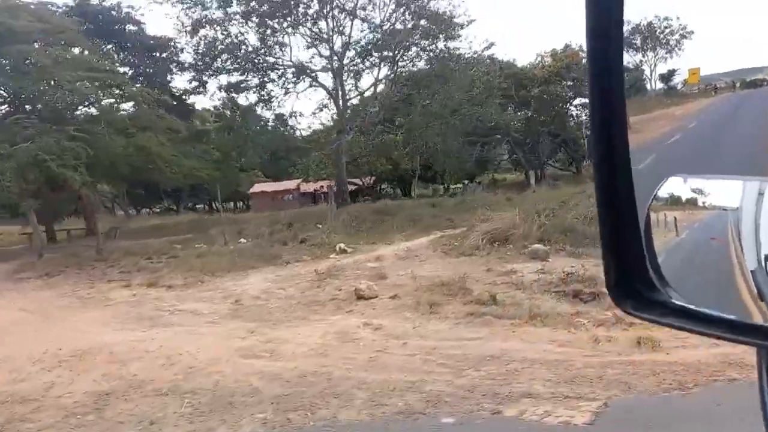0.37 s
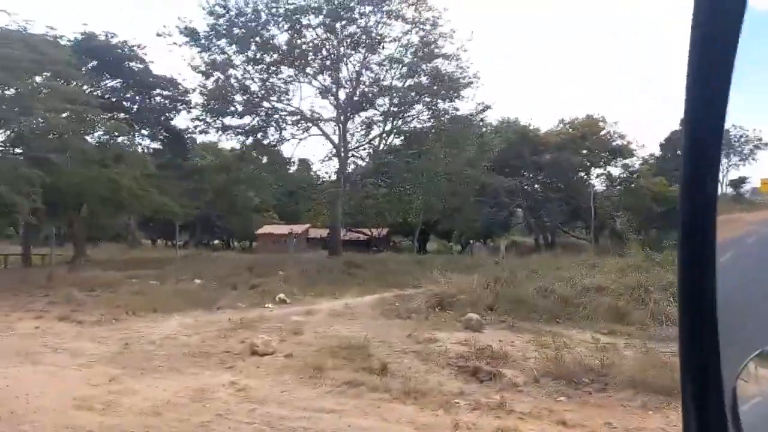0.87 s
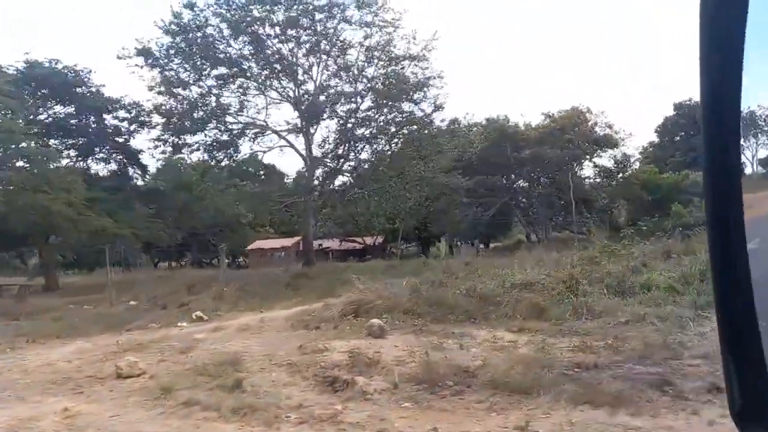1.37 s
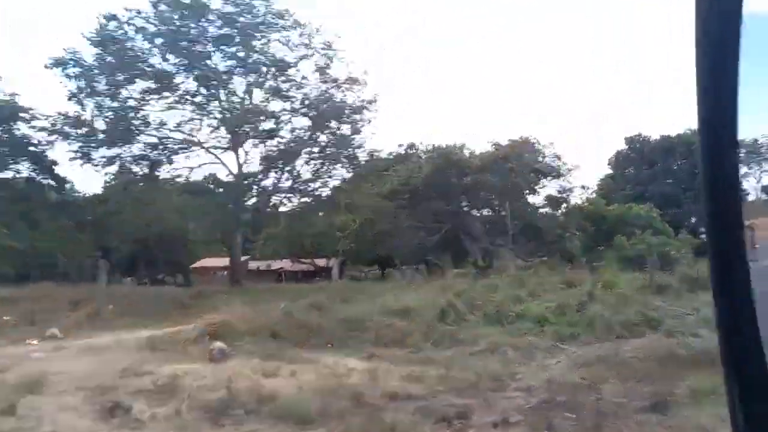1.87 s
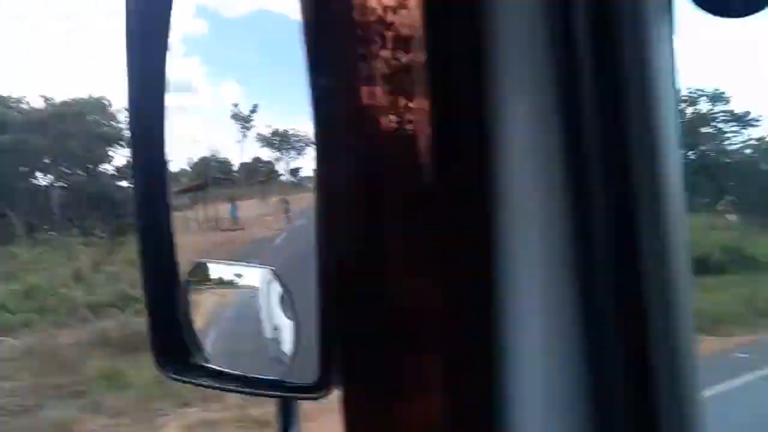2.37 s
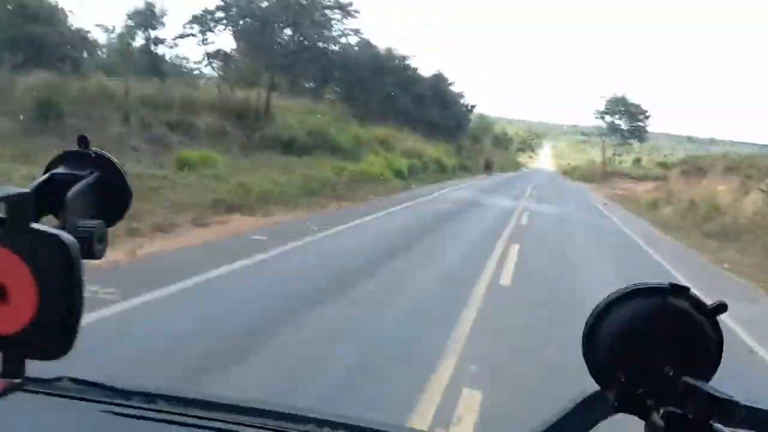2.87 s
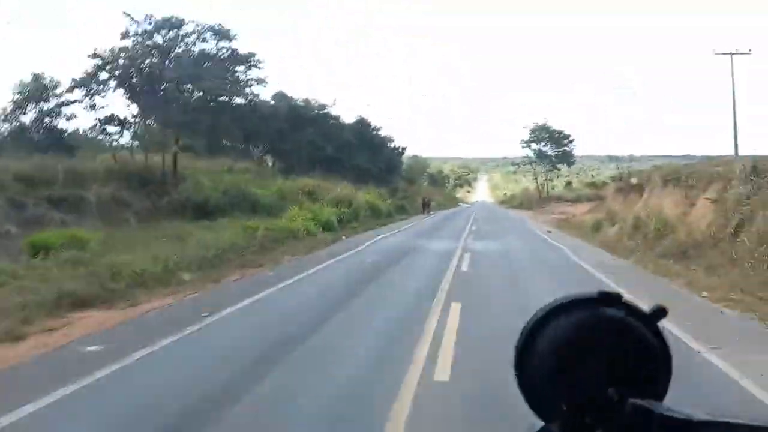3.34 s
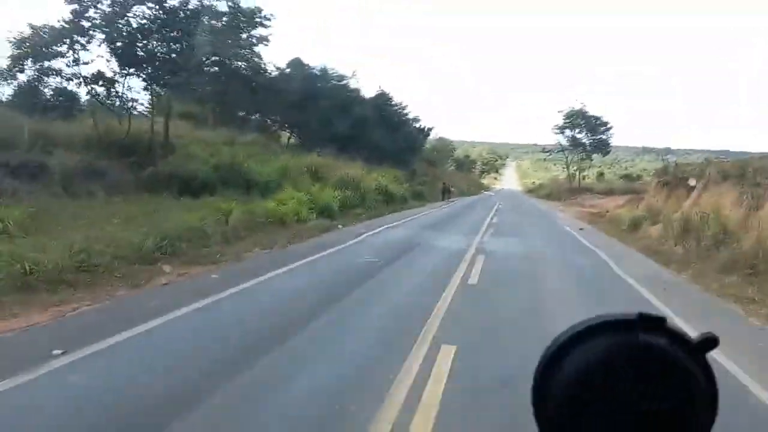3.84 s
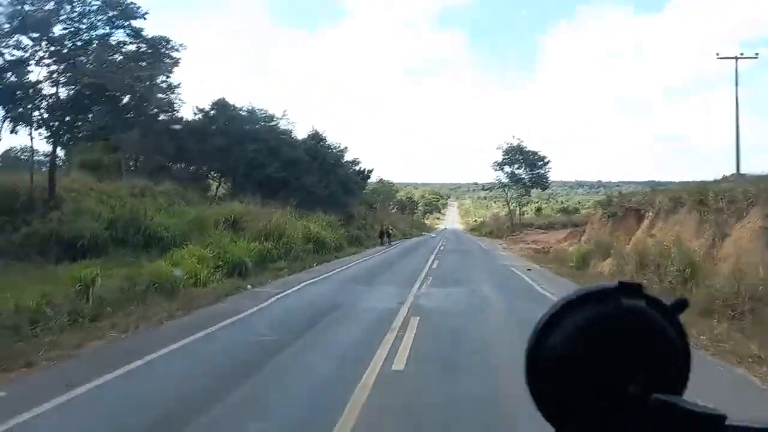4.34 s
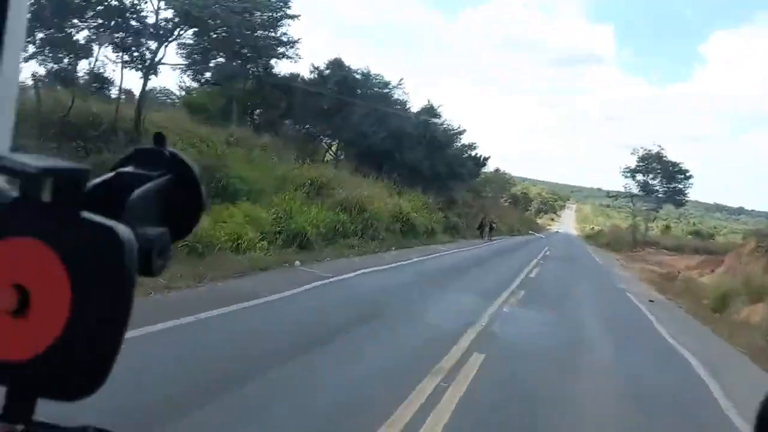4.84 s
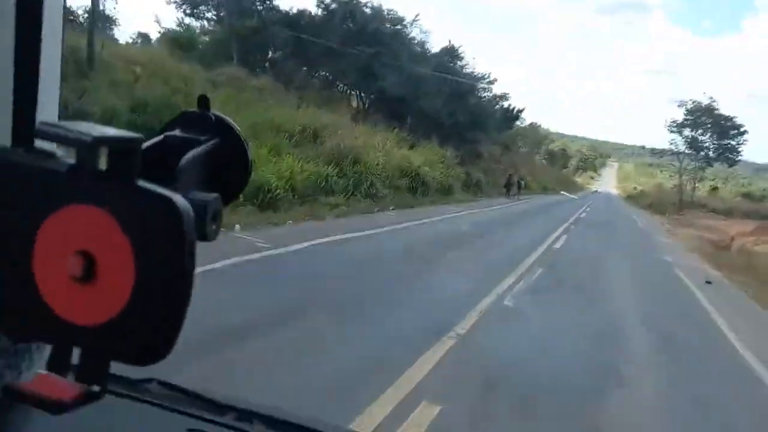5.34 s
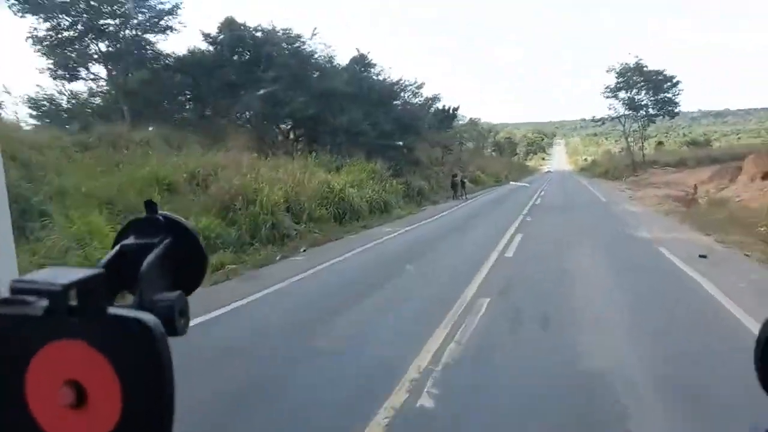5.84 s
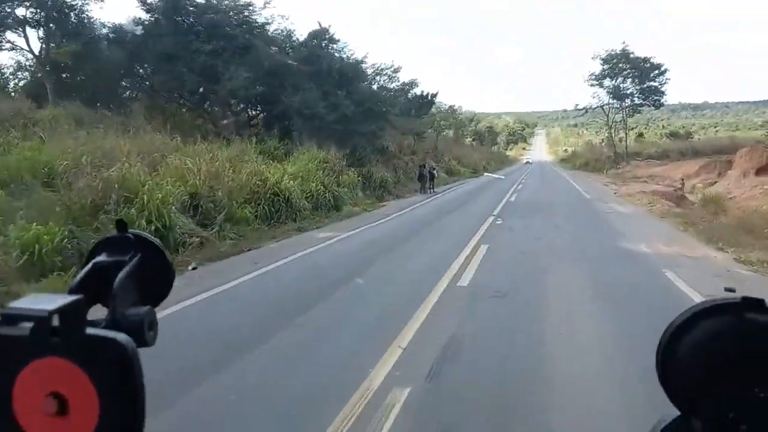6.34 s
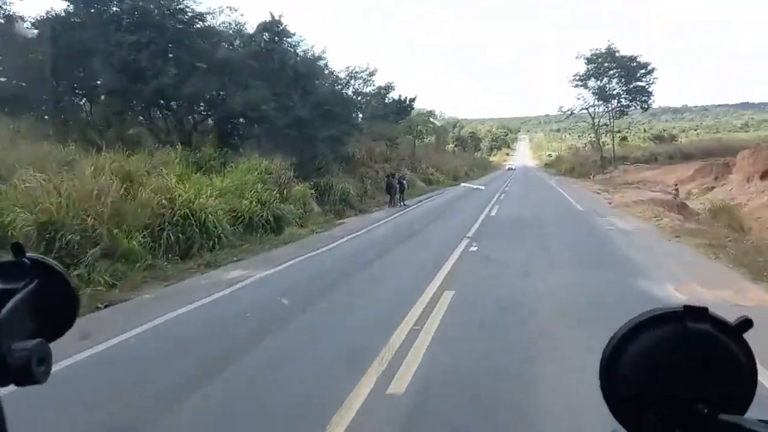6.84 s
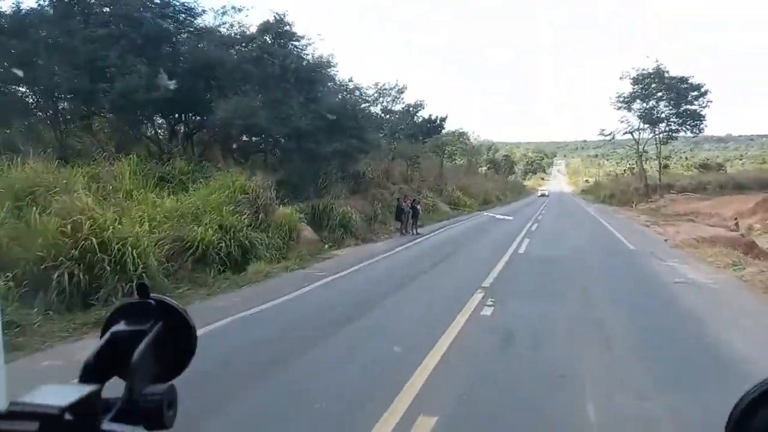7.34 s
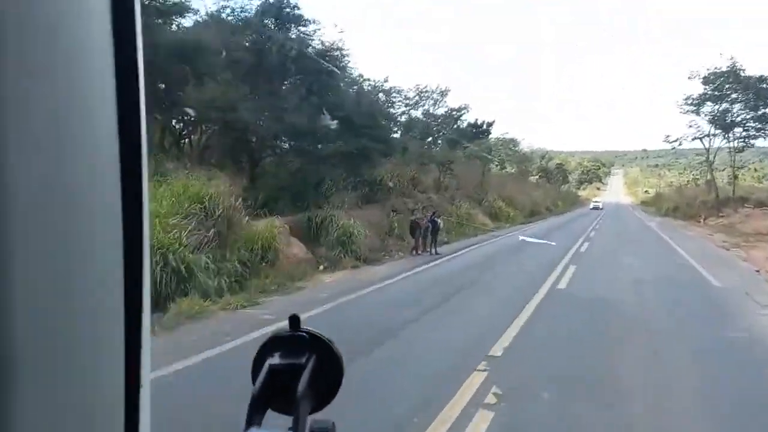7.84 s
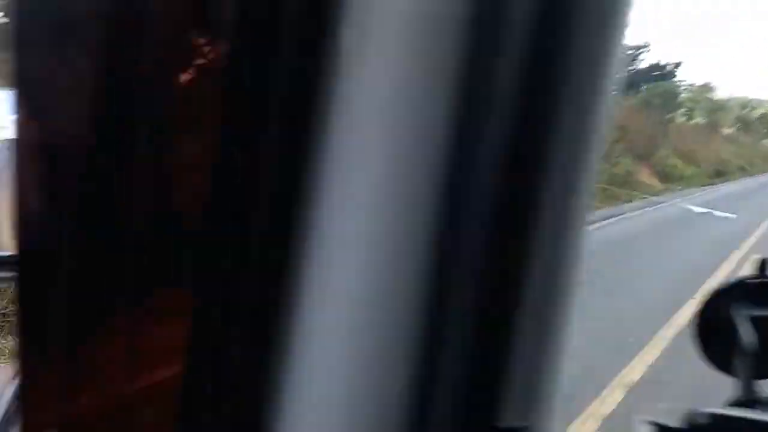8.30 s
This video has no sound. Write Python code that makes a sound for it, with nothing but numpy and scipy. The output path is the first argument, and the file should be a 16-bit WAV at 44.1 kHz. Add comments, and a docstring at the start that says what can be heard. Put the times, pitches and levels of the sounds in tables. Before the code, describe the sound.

Heavy truck engine heard from the cab: rising low drone, brief coasting at a gear change, renewed pull, with road roar and soft wind.

```python
"""Diesel truck cab pulling through a gear change

Inside the cab, the firing drone climbs, falls at the gear shift and pulls again: sines locked to the
count of firings, with one knocking cylinder gating narrow noise once per engine cycle. Road rumble, panel
boom, engine roar, wind and faint hiss are shaped noise; hums are resonant noise, bumps and trim ticks
decaying sines. A hand-held microphone pair turns from the open window past the dash to the windscreen."""
import sys
import numpy as np
from scipy import signal
from scipy.io import wavfile
from scipy.ndimage import uniform_filter1d

SR = 44100
rng = np.random.default_rng(int(sys.argv[2]) if len(sys.argv) > 2 else 0)


def natural_amplitude(level_db):
    """Convert a level in decibels to a linear amplitude factor, elementwise."""
    exponent = np.asarray(level_db, float) / 20
    return 10 ** exponent


def wav_out(sig):
    """Save sig, one row per channel (or a flat mono array), as 16-bit PCM at SR to the path in sys.argv[1]."""
    wavfile.write(sys.argv[1], SR, np.round(np.clip(np.atleast_2d(sig).T, -1, 1) * 32767).astype(np.int16))


N = 383265  # samples


def evened(x):
    """Normalisation: scales to rms 1."""
    return x / np.sqrt(np.mean(x ** 2) + 1e-20)


def read(points, hz):
    """Spectral interpolation: reads a table on a log-frequency axis."""
    f, value = np.transpose(points)
    return np.interp(np.log(hz + 1), np.log(f + 1), value)


def curve(rows, axis=1):
    """Linear envelope: one column of a table at every sample."""
    rows = np.array(rows)
    return np.interp(np.arange(N) / SR, rows[:, 0], rows[:, axis])


def drift(ms):
    """Random modulation: white noise averaged twice over a window, rms 1."""
    size = max(int(ms * SR / 1000), 2)
    smooth = uniform_filter1d(rng.standard_normal(N), size)
    return evened(uniform_filter1d(smooth, size))


def plateau(start, end, edge=0.0071):
    """Gating: rises to 1 between two moments, with linear edges lasting edge seconds."""
    t = np.arange(N) / SR
    return np.clip(np.minimum(t - start, end - t) / edge + .5, 0, 1)


def paired(rows, hz):
    """Interchannel coherence: likeness and phase lead as one complex number."""
    f, like, lead = np.transpose(rows)
    return np.interp(hz, f, np.clip(like, 0, .99) * np.exp(-1j * lead))


# how the microphone pair faces: time_s, position (0 window, 1 dash, 2 windscreen)
FACING = [(0, 0), (2.4, 0), (3.0, 1), (4.0, 1), (4.8, 2), (8.7, 2)]
# likeness of the two microphones at the window: pitch_hz, likeness (0-1), left_lead_rad
PAIR_AT_WINDOW = [(200, .8, 0), (650, .5, -.2), (900, .45, .3), (1150, .6, -2.2), (1400, .65, 2.6),
                  (1700, .7, 2.8), (2000, .5, -1.6), (2300, .55, -.2), (2700, .55, .2), (3500, .15, 2.1),
                  (4400, .3, .4), (5200, .6, -2.5), (6200, .2, 2.1)]
# the same turned inside: pitch_hz, likeness (0-1), left_lead_rad
PAIR_IN_CAB = [(200, .93, -.1), (400, .65, -.2), (650, .65, -.4), (900, .4, -1.9), (1150, .65, -2.5),
               (1400, .6, -3.1), (1700, .3, -3.1), (2000, .3, -.7), (2300, .4, .2), (2700, .25, 1.4),
               (3200, .36, 3.0), (4400, .25, -1.1), (6200, .2, 1.2)]


def likeness(hz, t):
    """Interchannel coherence: how the right microphone follows the left as the pair turns."""
    inside = np.clip(np.interp(t, *np.transpose(FACING)), 0, 1)
    return (1 - inside) * paired(PAIR_AT_WINDOW, hz) + inside * paired(PAIR_IN_CAB, hz)


# balance of the two microphones: pitch_hz, left_minus_right_db
BALANCE = [(60, -1.5), (120, 0.5), (230, -1), (440, -1.0), (860, -0.5), (1670, -2), (3240, 0), (6300, 0)]
STREAKS_DB = 1.54  # rms depth of thin, short-lived lines in every noise


def noise(colour_db, same, patchy_db, size):
    """Spectral shaping: two-channel noise of rms 1 with spectrum colour_db(hz, t) and drifting patches."""
    hop = size // 4
    hz = np.fft.rfftfreq(size, 1 / SR)[:, None]
    t = np.arange(N // hop + 5) * hop / SR
    a, b, c, d, patches = rng.standard_normal((len(t), len(hz), 5)).T
    patches = uniform_filter1d(patches, size=size // 128, axis=0)
    patches = evened(uniform_filter1d(patches, size=2560 // hop, axis=1))
    streaks = uniform_filter1d(rng.standard_normal((len(t), len(hz))).T, size=2, axis=0)
    streaks = evened(uniform_filter1d(streaks, size=16, axis=1))
    shape = natural_amplitude(colour_db(hz, t) + 0 * t)
    shape = shape / np.linalg.norm(shape, axis=0)  # equal power in every frame
    shape = shape * natural_amplitude(patchy_db * patches + STREAKS_DB * streaks)
    same, left = same(hz, t), a + 1j * b
    right = same * left + np.sqrt(1 - abs(same) ** 2) * (c + 1j * d)
    z = np.array([left, right]) * shape
    z = z * natural_amplitude(np.array([.5, -.5])[:, None, None] * read(BALANCE, hz))
    return evened(signal.istft(z, nperseg=size, noverlap=size - hop)[1][:, :N])


def narrow(hz, width, s, steady=0, wander=1):
    """Resonance: a one-pole filter three times over noise, then shifted up to hz.

    steady (0-1) evens out the fading; wander multiplies the pitch."""
    r, same = np.exp(-np.pi * width / SR), likeness(hz, s)
    left, other = rng.standard_normal((2, N)) + 1j * rng.standard_normal((2, N))
    z = np.array([left, same * left + np.sqrt(1 - abs(same) ** 2) * other])
    z = signal.lfilter([1], np.poly([r, r, r]), z)
    z = z / (abs(z) + 1e-9) ** steady
    turns = hz * np.cumsum(wander + np.zeros(N)) / SR
    return evened((z * np.exp(2j * np.pi * turns)).real)


TREBLE_EDGE_HZ = 6950


def below_treble_edge(x):
    """Band limiting: a steep elliptic low-pass at the treble edge."""
    return signal.sosfilt(signal.ellip(8, .5, 70, TREBLE_EDGE_HZ, fs=SR, output="sos"), x)


# engine speed: time_s, firing_rate_hz
ENGINE_SPEED = [(0.0, 54.2), (0.41, 56.35), (1.25, 59.97), (1.64, 61.8), (2.1, 65.47), (2.59, 70.2),
                (3.47, 78.7), (3.76, 82.36), (4.43, 88.3), (4.6, 89.5), (5.65, 57.9), (5.85, 62),
                (6.5, 65.04), (7.1, 64), (8.69, 70.4)]


def firing_turns():
    """Phase accumulation: counts firings while the crank speed wavers a little."""
    return np.cumsum(curve(ENGINE_SPEED) * (1 + .003 * drift(ms=60))) / SR


# engine orders: multiple_of_firing_rate, level_db (at full speed and load)
ENGINE_ORDERS = [(7 / 6, -30), (1.5, -29), (5 / 3, -37), (2.0, -38), (2.5, -46)]
# cab resonance on the firing tone: pitch_hz, level_db (at full load)
CAB_RESONANCE = [(54, -29), (59, -23), (66, -18), (73, -15), (78.5, -10.5), (83, -19), (90, -22)]
# the engine pulls in two gears and coasts between: start_s, end_s, load_db
GEAR_PULLS = [(.2, 4.64, 0), (5.68, 7.1, -3.5)]
COAST_DB, PEDAL_S = -24.5, .25
ORDERS_DB_PER_HZ = 0.16  # the orders grow with firing rate


def drone(turns):
    """Forced vibration: a firing tone lifted by the cab's resonance, and orders wavering separately."""
    hz = curve(ENGINE_SPEED)
    tone = natural_amplitude(read(CAB_RESONANCE, hz) + .7 * drift(ms=40)) * np.sin(2 * np.pi * turns)
    for k, db in ENGINE_ORDERS:
        order_db = db + ORDERS_DB_PER_HZ * (hz - hz.max()) + 1.5 * drift(ms=350)
        tone = tone + natural_amplitude(order_db) * np.sin(2 * np.pi * (k * turns + rng.random()))
    load_db = COAST_DB + sum((db - COAST_DB) * plateau(a, b, PEDAL_S) for a, b, db in GEAR_PULLS)
    return np.sqrt(2) * natural_amplitude(load_db) * tone


# knock in each stretch of time: start_s, end_s, pitch_hz, width_hz, level_db, place_in_cycle (0-1)
KNOCK_BANDS = [(-.1, .62, 975, 170, -23.5, .25), (.8, 1.4, 1150, 220, -30, .65),
               (2.2, 4.05, 735, 110, -28.5, .36)]
# the ring wanders as the hand moves the pair: time_s, pitch_share, lift_db, extra_second_share
KNOCK_RING = [(2.2, 0.93, -6, .5), (2.3, 0.95, 1, 0.76), (2.45, 1, 1.5, 0.4), (2.55, 0.97, 0, 0.011),
              (2.8, 0.9, -8, 0.098), (2.92, 0.92, 3.5, 0.12), (3.02, 0.99, 0, 0.16), (3.1, 1.03, -4, 0),
              (3.22, 1.03, -5, 0), (3.4, .97, -1.5, 0), (3.55, 1.06, -1.5, 0.19), (3.72, 1, 1, 0),
              (3.85, 1.04, -0.5, 0.4), (3.97, 0.96, -0.5, 0.089)]
# share of a second cylinder, one crank turn later, in each stretch: share
SECOND_SHARE = [.15, .3, .3]
CYLINDERS = 6


def knock(turns):
    """Periodic excitation: one cylinder bursts once per cycle, another, mostly weaker, half a cycle on."""
    out, moving = np.zeros((2, N)), np.arange(N) / SR > KNOCK_RING[0][0]
    pitch, lift_db, extra = (curve(KNOCK_RING, axis=k) for k in range(1, 4))
    wander = np.where(moving, pitch, 1)
    for (start, end, hz, width, db, when), second in zip(KNOCK_BANDS, SECOND_SHARE):
        cycle = np.cos(2 * np.pi * (turns / CYLINDERS - when))
        first_burst = np.exp(2.4 * (cycle - 1))
        second_burst = (second + moving * extra) * np.exp(-3 * (cycle + 1))
        level = natural_amplitude(db + moving * lift_db + .6 * drift(ms=60)) * plateau(start, end, edge=.1)
        out += level * (first_burst + second_burst) * narrow(hz, width, start, .85, wander)
    return out


# spectrum of the frame rumble: pitch_hz, relative_level_db_per_hz
RUMBLE_COLOUR = [(18, -48.5), (30, -36.5), (43, -36.5), (54, -25), (64, -11), (76, 0.5), (122, -3.5),
                 (150, -7), (174, -8), (220, -16), (290, -14.5), (480, -120)]
# spectrum of the panel boom: pitch_hz, relative_level_db_per_hz
PANEL_COLOUR = [(120, -34.5), (200, -3.5), (274, -2.5), (313, -1), (419, 1), (524, 0.5), (640, -6.5),
                (830, -48.5), (1410, -120)]
# level of the rumble: time_s, level_db
RUMBLE_LEVEL = [(0, -23.5), (.5, -25), (1.3, -28.5), (1.45, -25.5), (2.1, -25.5), (2.8, -27.5),
                (3.3, -27.5), (3.8, -27), (4.5, -23.5), (5.7, -20.5), (6.3, -20.5), (8.35, -17),
                (8.7, -18.5)]
# the panel band is turned down for a while: time_s, level_db
TURNED_DOWN_LEVEL = [(1.4, -29), (2.2, -30), (2.6, -34.5), (3.95, -37)]
RUMBLE_ALIKE = .93  # left-right likeness (0-1)
PANELS_EARLY_DB = -23.5  # before it is turned down
PANELS_DB, PANELS_RISE_DB_PER_S = -25.5, 0.6  # afterwards: level at 6 s, and a steady rise
BUFFET_DB, THUMPY_DB = 1.3, 1.6  # rms unevenness of the panels and of the frame


def road():
    """Structure-borne sound: tyres shake the frame into a lumpy rumble and the cab panels into a boom."""
    rumble = noise(lambda hz, t: read(RUMBLE_COLOUR, hz), lambda hz, t: RUMBLE_ALIKE, 1.0, size=4096)
    panels = noise(lambda hz, t: read(PANEL_COLOUR, hz), likeness, patchy_db=0.12, size=1024)
    t, start, end = np.arange(N) / SR, TURNED_DOWN_LEVEL[0][0], TURNED_DOWN_LEVEL[-1][0]
    # the switch to the later level falls inside the turned-down stretch
    open_db = np.where(t < end - 1, PANELS_EARLY_DB, PANELS_DB + PANELS_RISE_DB_PER_S * (t - 6))
    panels_db = open_db + (curve(TURNED_DOWN_LEVEL) - open_db) * plateau(start, end, edge=.012)
    rumble = natural_amplitude(curve(RUMBLE_LEVEL) + THUMPY_DB * drift(ms=22)) * rumble
    return rumble + natural_amplitude(panels_db + BUFFET_DB * drift(ms=30)) * panels


# spectrum of roar and hiss at the open window: pitch_hz, relative_level_db_per_hz
WINDOW_COLOUR = [(380, -59), (640, 1), (988, 2.5), (1230, 2), (1310, 4), (1820, -6), (2010, -5.5),
                 (2670, -10), (2890, -18.5), (3220, -18.5), (4250, -17), (5020, -17), (5540, -21),
                 (6430, -18), (6750, -22.5), (8780, -71), (14900, -120)]
# the same turned to the dash: pitch_hz, relative_level_db_per_hz
DASH_COLOUR = [(380, -42), (640, -18.5), (706, -0.5), (787, -14.5), (827, -8.5), (1030, -13.5), (1290, -7),
               (1510, -13), (1650, -14), (2050, -17.5), (3290, -28.5), (4370, -26), (5070, -34.5),
               (6300, -28.5), (6750, -38), (8780, -68), (14900, -120)]
# the same held to the windscreen: pitch_hz, relative_level_db_per_hz
SCREEN_COLOUR = [(380, -32), (640, -12), (699, 3.5), (772, -3.5), (835, -6.5), (1030, -4.5), (1190, -5.5),
                 (1540, -6), (1750, -13), (1870, -11.5), (2070, -12), (3220, -24.5), (4640, -30.5),
                 (6360, -27), (6750, -33.5), (8780, -62.5), (14900, -120)]


def heard_colour(hz, t):
    """Crossfading: blends the three spectra, in decibels, as the pair turns."""
    turn = np.interp(t, *np.transpose(FACING))
    colours = (WINDOW_COLOUR, DASH_COLOUR, SCREEN_COLOUR)
    return sum(np.maximum(1 - abs(turn - k), 0) * read(c, hz) for k, c in enumerate(colours))


# level of the roar: time_s, level_db
ROAR_LEVEL = [(0, -27.5), (.6, -24.5), (1.38, -25), (1.45, -23), (2.3, -24), (2.7, -27.5), (3.0, -28.5),
              (3.5, -30.5), (3.8, -28.5), (5.4, -29.5), (6.0, -28), (6.6, -26.5), (6.9, -27.5),
              (7.8, -27.5), (8.1, -28.5), (8.7, -26.5)]
# hiss relative to roar at window, dash and windscreen: level_db
HISS_RE_ROAR = [-12, -12, -14.5]
HISS_FROM_HZ = 2900


def roar(turns):
    """Amplitude modulation: combustion clatter and rushing air pulse lightly with each firing."""
    low = noise(lambda hz, t: heard_colour(hz, t) - 100 * (hz > HISS_FROM_HZ), likeness, 1.26, size=1024)
    high = noise(lambda hz, t: heard_colour(hz, t) - 100 * (hz <= HISS_FROM_HZ), likeness, 1.5, size=1024)
    beat = 1 + 0.11 * np.cos(2 * np.pi * turns)
    flutter_db = 0.5 * drift(ms=10)
    high = signal.sosfiltfilt(signal.ellip(8, .5, 70, TREBLE_EDGE_HZ, fs=SR, output="sos"), high)
    low = natural_amplitude(curve(ROAR_LEVEL) + flutter_db + .4 * drift(ms=35)) * low
    hiss_db = curve(ROAR_LEVEL) + np.interp(curve(FACING), range(len(HISS_RE_ROAR)), HISS_RE_ROAR)
    high = natural_amplitude(hiss_db + flutter_db + 1.1 * drift(ms=14)) * high
    return beat * (low + high)


# wind at each microphone: time_s, level_db
WIND_LEVEL = [(0.1, -41), (0.45, -33), (1.9, -30.5), (2.6, -34), (4.1, -31.5), (5.4, -38), (6.6, -35.5),
              (6.95, -31), (8.4, -29)]
# spectrum of the wind: pitch_hz, relative_level_db_per_hz
WIND_SPECTRUM = [(30, -35), (60, -4), (90, 0), (190, -8), (330, -11), (600, -35), (1500, -110)]


def wind():
    """Turbulence: lumpy low-frequency puffs, uncorrelated between the microphones."""
    puffs = noise(lambda hz, t: read(WIND_SPECTRUM, hz), lambda hz, t: 0, patchy_db=2.5, size=2048)
    lumps_db = 3.0 * np.array([drift(ms=40), drift(ms=40)])
    return natural_amplitude(curve(WIND_LEVEL)) * evened(natural_amplitude(lumps_db) * puffs)


# spectrum of the faint hiss: pitch_hz, relative_level_db_per_hz
AIR_COLOUR = [(7500, -90), (10800, -45), (12000, -10), (14200, -14), (15300, 0), (15800, -6)]
# level of the faint hiss: time_s, level_db
AIR_LEVEL = [(0, -73), (2.8, -70.5), (3.2, -77), (7.5, -80), (7.7, -70.5), (8.42, -77), (8.5, -73),
             (8.7, -67)]


def air():
    """Band-limited noise: a very faint hiss at the top of the range."""
    hiss = noise(lambda hz, t: read(AIR_COLOUR, hz), lambda hz, t: 0 * hz, patchy_db=1.5, size=512)
    return natural_amplitude(curve(AIR_LEVEL)) * hiss


# bands from the boom of the cab up to faint, narrow hiss at the very top: start_s, end_s, pitch_hz, width_hz
HUM_BANDS = [(1.4, 1.75, 122, 12), (4.5, 5.6, 83, 16), (7.45, 7.72, 82, 24), (8.2, 8.7, 78, 12),
             (7.7, 8.68, 385, 30), (4.0, 7.4, 725, 150), (6.0, 7.3, 158, 30), (1.25, 1.6, 5150, 350),
             (1.6, 2.25, 5100, 450), (2.0, 2.7, 1400, 700), (3.4, 4.55, 1310, 140), (1.8, 2.25, 4350, 500),
             (.8, 1.9, 2620, 260), (7.6, 7.95, 6400, 400), (7.8, 7.95, 15300, 600), (8.03, 8.2, 15300, 600),
             (8.3, 8.8, 15300, 600), (8.14, 8.38, 10500, 400), (8.26, 8.45, 9800, 300)]
# level of each band, in the same order: level_db
HUM_LEVELS = [-27, -26.5, -19, -20, -30, -37, -26, -38.5, -41, -30.5, -39.5, -41, -42, -46, -52.5, -56.5,
              -56, -62, -65]


def hums():
    """Resonance: narrow bands of noise that swell and fade."""
    out = np.zeros((2, N))
    for (start, end, hz, width), db in zip(HUM_BANDS, HUM_LEVELS):
        band = narrow(hz, width, start)
        if hz < TREBLE_EDGE_HZ:
            band = below_treble_edge(band)
        out += natural_amplitude(db + 2.2 * drift(ms=39)) * plateau(start, end, edge=.08 + 10 / hz) * band
    return out


# the wheels hit a bump: time_s (centre of the thud), pitch_hz, level_db (top of the envelope)
WHEEL_BUMPS = [(4.57, 79, -12.5), (6.9, 42, -29), (7.2, 30, -36), (8.47, 164, -24)]
BUMP_S = .035  # Gaussian half-width, to 1/e


def bumps():
    """Impulse response: each bump is a short soft thud of the frame, a sine under a Gaussian."""
    t, out = np.arange(N) / SR, np.zeros(N)
    for s, hz, db in WHEEL_BUMPS:
        out += natural_amplitude(db) * np.exp(-((t - s) / BUMP_S) ** 2) * np.sin(2 * np.pi * hz * (t - s))
    return out


# trim snapping: start_s, level_db (rms of the first 20 ms), pitch_share
TRIM_TICKS = [(7.3705, -25, 1.0), (7.405, -42, 0.8)]
# modes of the plastic trim: pitch_hz, level_db, t60_s
TRIM_MODES = [(3400, -8, .004), (4080, 0, .006), (4550, -3, .004), (5200, -6, .003), (5950, 0, .005),
              (6500, -7, .003)]


def tick():
    """Modal decay: trim snaps and settles with a smaller tick; the small cab scatters both."""
    size = 4000
    t, out = np.arange(size) / SR, np.zeros((2, N))
    for s, level_db, pitch in TRIM_TICKS:
        ring = sum(natural_amplitude(db - 60 * t / t60) * np.sin(2 * np.pi * pitch * hz * t) for hz, db, t60 in TRIM_MODES)
        sparse = rng.standard_normal((2, size)) * (rng.random((2, size)) < .4)
        echoes = sparse * natural_amplitude(-10 - 60 * t / .06) * (t > .001)  # t60 0.06 s
        echoes[:, 0] = 1  # direct sound
        ring = signal.fftconvolve(ring[None] * np.minimum(t / .0015, 1), echoes, axes=1)[:, :size]
        ring = below_treble_edge(ring)
        at = round(s * SR)
        out[:, at:at + size] += natural_amplitude(level_db) * ring / ring[:, :900].std()
    return out


def scene():
    """Superposition: everything that reaches the two microphones."""
    turns = firing_turns()
    engine = drone(turns) + knock(turns) + roar(turns)
    return engine + road() + wind() + air() + hums() + bumps() + tick()


def top_cut(x):
    """Nothing passes above the cut-off."""
    return signal.sosfilt(signal.butter(12, 15800, fs=SR, output="sos"), x)


# the bass drops out, mostly in one microphone: start_s, end_s, left_db, right_db
BASS_DROPS = [(.59, .8, -1, -16), (1.08, 1.4, 0, -5), (1.75, 1.81, -6, -16), (8.53, 8.75, -3, -8),
              (8.57, 8.75, -4, -16)]
# the level dips briefly, mostly more in the treble: start_s, end_s, below_split_db, above_split_db
LEVEL_DIPS = [(.592, .622, -1, -6), (.58, .79, -2, -2), (.69, .76, -3, -2.5), (1.74, 1.8, -3, -3),
              (1.95, 2.0, -6, -6.5), (8.565, 8.675, -3.5, -8), (8.62, 8.665, -6, -2)]
BASS_HZ, DIP_SPLIT_HZ = 200, 1300


def record(dry):
    """Band splitting: brief drops of the bass, then brief dips of level on either side of a split."""
    bass = signal.sosfiltfilt(signal.butter(2, BASS_HZ, fs=SR, output="sos"), dry)
    drop_db = sum(np.array([[left], [right]]) * plateau(a, b) for a, b, left, right in BASS_DROPS)
    dropped = dry + (natural_amplitude(drop_db) - 1) * bass
    low = signal.sosfiltfilt(signal.butter(1, DIP_SPLIT_HZ, fs=SR, output="sos"), dropped)
    high = dropped - low
    low_db, high_db = sum(np.array([[below], [above]]) * plateau(a, b, edge=0.011)
                          for a, b, below, above in LEVEL_DIPS)
    return top_cut(natural_amplitude(low_db) * low + natural_amplitude(high_db) * high)


dry = scene()
out = record(dry)
wav_out(out)
```